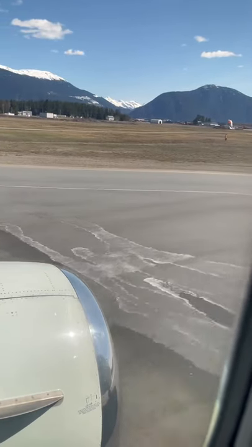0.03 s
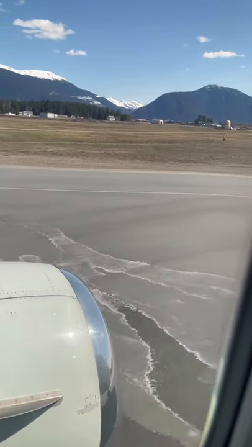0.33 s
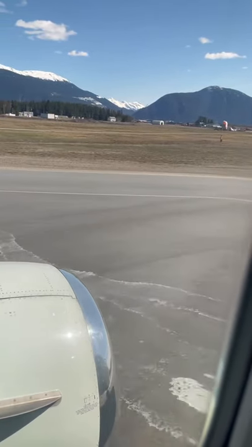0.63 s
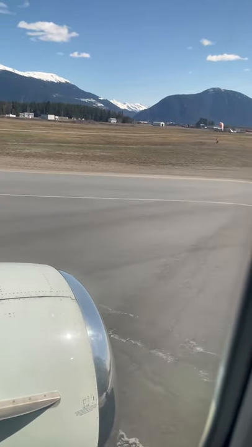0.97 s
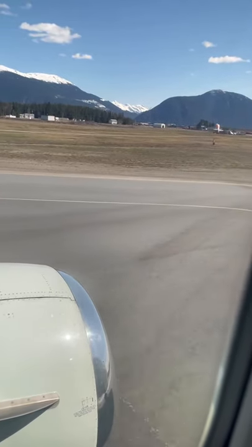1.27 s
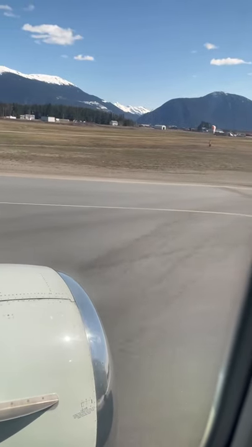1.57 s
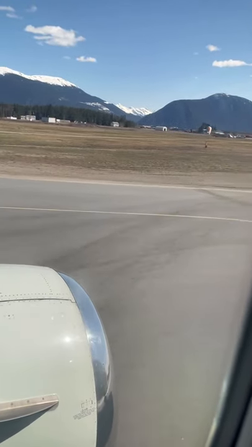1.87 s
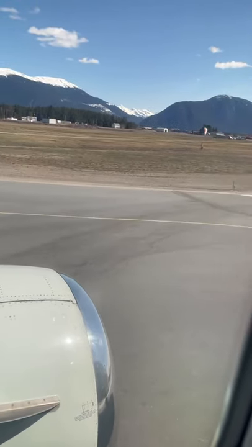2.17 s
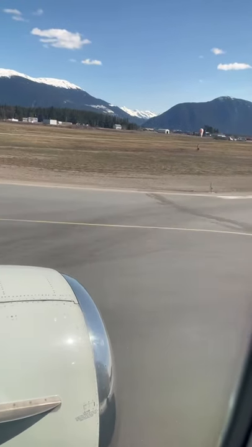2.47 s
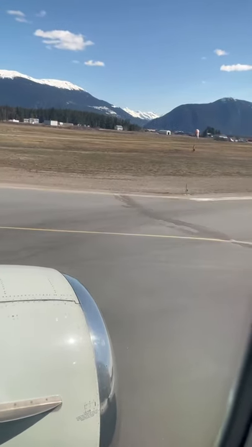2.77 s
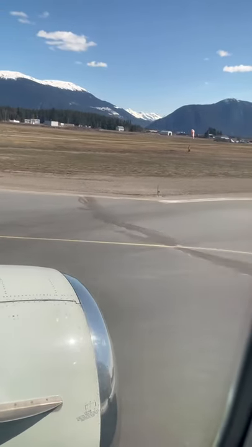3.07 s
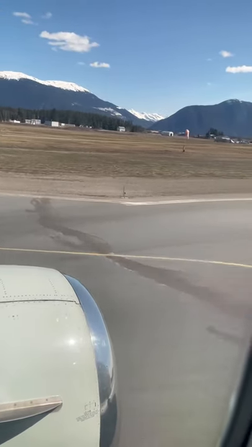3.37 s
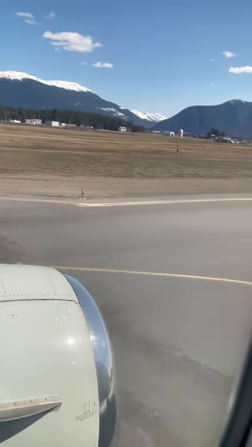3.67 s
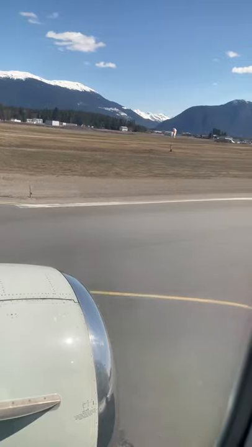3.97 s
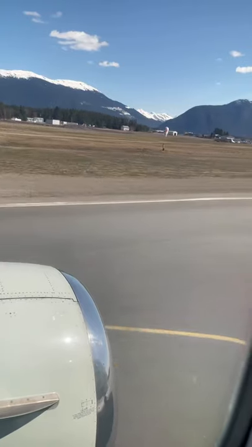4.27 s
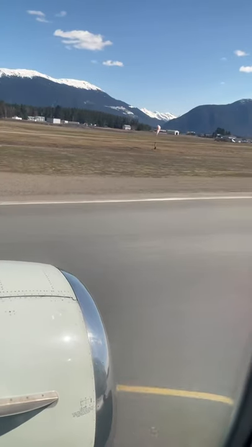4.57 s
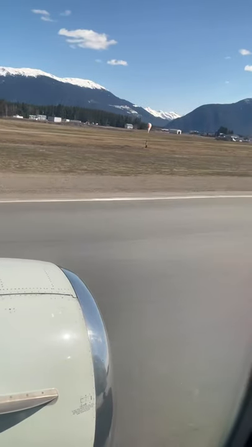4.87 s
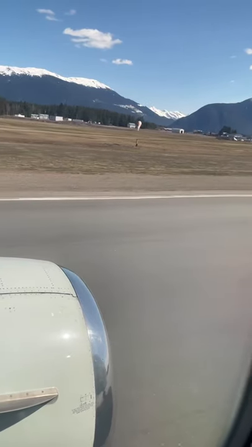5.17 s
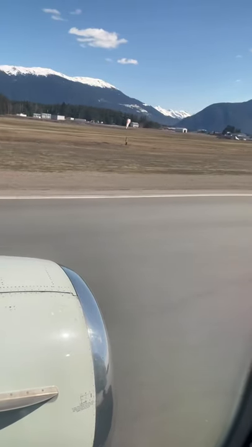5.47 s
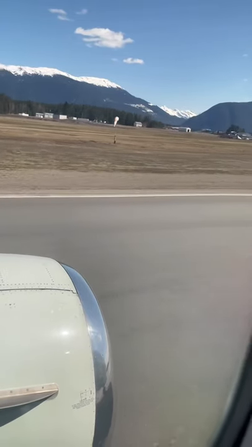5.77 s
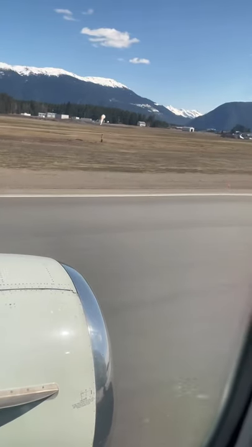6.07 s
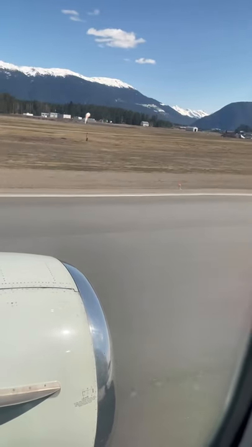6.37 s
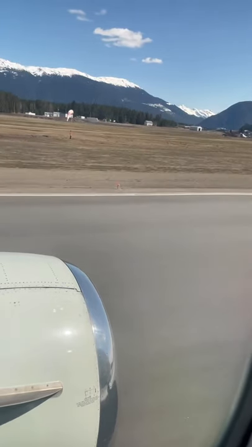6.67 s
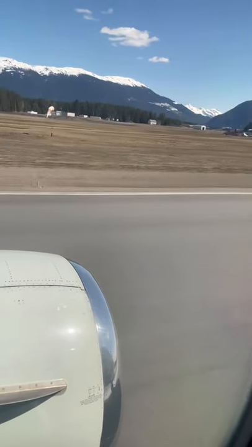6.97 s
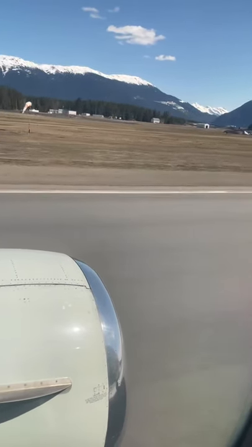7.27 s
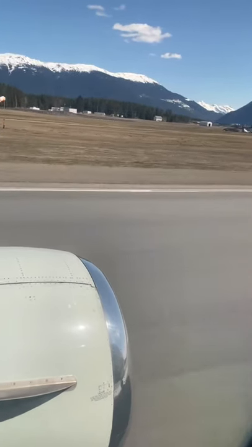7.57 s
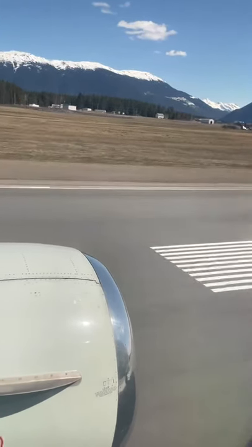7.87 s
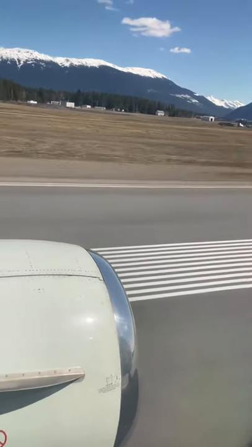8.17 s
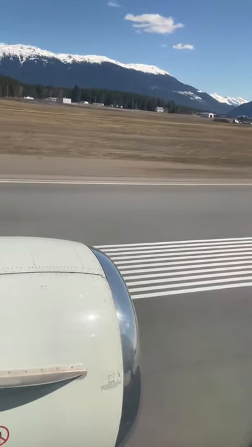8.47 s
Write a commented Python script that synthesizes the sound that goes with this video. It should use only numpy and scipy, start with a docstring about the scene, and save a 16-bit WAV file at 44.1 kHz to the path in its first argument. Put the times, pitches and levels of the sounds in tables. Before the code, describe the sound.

Inside an airliner on its takeoff roll, a heavy engine rumble and tyre drone build while a fan whine climbs in pitch.

```python
"""Rumble fills an airliner cabin and a fan whine climbs: the takeoff roll, from a seat by the engine.
Exhaust shakes the fuselage, the jet roars through the wall and the tyres drone louder with speed.
Near full power, shocks at the blade tips add a buzz of shaft orders. Ventilation hisses and
whistles, slipping plastic trim ticks and rustles, and a loose wall panel knocks.
A limiter holds the peaks down."""
import sys
import numpy as np
from scipy import signal
from scipy.fft import rfft, irfft, next_fast_len
from scipy.io import wavfile
from scipy.ndimage import uniform_filter1d, minimum_filter1d

SR = 44100
rng = np.random.default_rng(int(sys.argv[2]) if len(sys.argv) > 2 else 0)


def master_out(mix):
    """Clip the mix to full scale and print it as 16-bit PCM to the path in sys.argv[1]."""
    frames = np.transpose(np.atleast_2d(mix))
    ceiling = np.clip(frames, -1, 1)
    pcm = np.round(ceiling * 32767).astype(np.int16)
    wavfile.write(sys.argv[1], SR, pcm)


N = 384111
TIME = np.arange(N) / SR
# flat spectrum: f/Hz, level/dB
WHITE = [(20, 0), (20000, 0)]


def from_db(db):
    """Decibels to gain."""
    return 10 ** (np.asarray(db) / 20)


def unit_rms(x):
    """Scale to rms 1."""
    return x / np.sqrt(np.mean(x ** 2) + 1e-20)


def over_time(curve):
    """A (t/s, value) curve at every sample."""
    return np.interp(TIME, *np.transpose(curve))


def at_hz(curve, hz):
    """Read a (f/Hz, value) curve on a log-frequency axis."""
    known_hz, values = np.transpose(curve)
    return np.interp(np.log(hz + 1), np.log(known_hz), values)


def bell(x, centre, width):
    """Gaussian of height 1; full width at half height."""
    return 0.5 ** ((2 * (x - centre) / width) ** 2)


def drift(rate_hz):
    """Smooth random wander, rms 1."""
    hop, settle = 100, 2000
    pole = np.exp(-2 * hop * np.pi * rate_hz / SR)
    noise = rng.standard_normal(N // hop + settle + 2)
    slow = signal.lfilter([1], [1, -2 * pole, pole * pole], noise)[settle:]
    return np.interp(np.arange(N) / hop, np.arange(len(slow)), unit_rms(slow))


def cabin_noise(spectrum):
    """Diffuse stereo noise, rms 1, shaped by a (f/Hz, level/dB) spectrum."""
    # left-right likeness: f/Hz, correlation
    likeness = [(70, .9995), (150, .99), (300, .92), (400, .8), (530, 0), (1000, -.05), (1850, .82),
                (2700, .42), (4800, .1), (6000, .7), (8000, -.25), (9300, -.97), (11000, -.96), (14500, .9)]
    # balance: f/Hz, left minus right/dB
    balance = [(60, .1), (110, .7), (200, 2), (350, 3.3), (700, .4), (4400, -.2), (8000, 0)]
    size = next_fast_len(N)
    hz = np.arange(size // 2 + 1) * SR / size
    mid, side = rfft(rng.standard_normal((2, size)))
    correlation = np.clip(at_hz(likeness, hz), -1, 1)
    sign = np.array([[1], [-1]])
    field = np.sqrt(1 + correlation) * mid + sign * np.sqrt(1 - correlation) * side
    rolloff = np.maximum(hz / spectrum[-1][0], 1) ** -6
    gain = from_db(at_hz(spectrum, hz) + sign * at_hz(balance, hz) / 2)
    return unit_rms(irfft(field * rolloff * gain, size)[:, :N])


def cabin_tone(hz, scatter, rate_hz, apart_rad=0):
    """Stereo sine, rms 1: a direct path, apart_rad between channels, plus shifting reflections."""
    carrier = np.exp(2j * np.pi * np.cumsum(hz) / SR)
    paths = np.array([np.exp(1j * apart_rad * channel) + scatter * (drift(rate_hz) + 1j * drift(rate_hz))
                      for channel in range(2)])
    return unit_rms((paths * carrier).real)


def cabin_gain(hz):
    """Gain of a fan tone at the seat: bell-shaped peaks with gaps between."""
    # cabin response peaks: f/Hz, width/Hz, level/dB
    peaks = [(296, 6, -36), (300.5, 2.6, -22), (303.7, 2.3, -27.5), (306.8, 1, -28), (308.1, 2.2, -24.6),
             (310, 2.4, -25.8), (364, 22, -34.5), (380.3, 6, -31), (388, 8, -41), (1925, 24, -67),
             (2060, 64, -62), (2135, 56, -67.5), (2216, 28, -66.5), (2260, 32, -62.5), (2323, 34, -62),
             (2410, 30, -59.5), (2508, 62, -57.5), (2590, 44, -62), (2500, 900, -71), (2674, 22, -60.5),
             (2709, 28, -56.5), (2738, 24, -63.3), (2752, 20, -64.5), (2785, 22, -66), (2809, 30, -60),
             (2844, 36, -59.5), (2882, 26, -67), (2903, 14, -64.5), (2936, 12, -70.5), (4310, 60, -75),
             (4520, 70, -71), (4645, 85, -71), (4970, 190, -72.7), (5200, 80, -70), (5350, 130, -73),
             (5468, 28, -72), (5565, 40, -75), (5678, 38, -71)]
    grid_hz = np.linspace(hz.min(), hz.max(), 2000)
    power = sum((from_db(db) * bell(grid_hz, peak_hz, width_hz)) ** 2 for peak_hz, width_hz, db in peaks)
    return np.interp(hz, grid_hz, np.sqrt(power))


def resonate(x, hz, width_hz):
    """Band-pass, applied twice for steep skirts; white noise keeps about its power."""
    r = np.exp(-np.pi * width_hz * np.sqrt(2) / SR)
    section = [(1 - r * r) / 2, 0, (r * r - 1) / 2, 1, -2 * r * np.cos(2 * np.pi * hz / SR), r * r]
    return signal.sosfilt([section, section], x + 1e-18) * np.sqrt(SR / 2 / width_hz)


def ring_through(x, resonances):
    """Parallel resonances: f/Hz, width/Hz, gain/dB."""
    return sum(from_db(db) * resonate(x, hz, width_hz) for hz, width_hz, db in resonances)


def exhaust_rumble(spool, surge):
    """Exhaust shakes the fuselage, harder with fan speed and acceleration."""
    # rumble spectrum: f/Hz, level/dB
    spectrum = [(8, -26.5), (15, -24), (30, -22), (38, -15.5), (48, -2), (66, 2), (88, -3), (115, -1),
                (135, -8.5), (150, -6), (172, -16.5), (230, -34.5)]
    return from_db(-24.5 + 5.5 * spool + 2 * surge) * cabin_noise(spectrum)


def tyre_drone(final_db=-24.5):
    """Tyres drone louder as ground speed builds."""
    # tyre spectrum: f/Hz, level/dB
    spectrum = [(60, -29), (80, 4), (112, 3), (135, -11.5), (155, -8.5), (185, -16.5), (260, -24.5)]
    speed = TIME / TIME[-1]
    return from_db(final_db) * speed ** 0.74 * cabin_noise(spectrum)


def jet_roar(spool, surge):
    """Jet mixing noise, dulled by the wall; its level flutters."""
    # roar spectrum: f/Hz, level/dB
    spectrum = [(140, -19), (180, -4.5), (215, 0.5), (265, -2.5), (300, -0.95), (350, -7), (405, -7.5),
                (450, -11.5), (510, -17), (720, -25), (950, -33.5), (1050, -32.5), (1200, -45.5)]
    level_db = -26 + 2 * spool + 2.5 * surge + 0.91 * drift(rate_hz=13)
    return from_db(level_db) * cabin_noise(spectrum)


def fan_whine(blade_hz, floor_db=-78, octave_floor_db=-79):
    """The blade-passing tone and its octave waver, and swell at each cabin peak they cross."""
    # brief dips of the fundamental: t/s, length/s, depth/dB
    dips = [(4.21, .08, 7), (4.52, .16, 6), (5.50, .08, 11), (5.70, .07, 6), (6.02, .2, 10), (7.88, .18, 7)]
    # standing waves put left and right out of step: f/Hz, phase difference/rad
    phases = [(2400, .4), (2510, 1.2), (2600, .5), (2700, .7), (2730, 2.1), (2748, 1.3), (2765, .6),
              (2950, .6)]
    hz = blade_hz * (1 + 0.0009 * drift(rate_hz=12))
    dip_db = sum(db * bell(TIME, at_s, length_s) for at_s, length_s, db in dips)
    whine = cabin_tone(hz, scatter=0.42, rate_hz=18, apart_rad=at_hz(phases, blade_hz))
    whine *= np.hypot(from_db(floor_db), cabin_gain(blade_hz))
    octave = cabin_tone(2 * hz, scatter=1.1, rate_hz=18)
    octave *= np.hypot(from_db(octave_floor_db), cabin_gain(2 * blade_hz))
    return from_db(-dip_db) * whine + octave


def ventilation(surge, sink_db_per_s=0.17):
    """Rushing air, hollow resonances and blower whistle; all swell with the surge and sink slowly."""
    # air rush spectrum: f/Hz, level/dB
    spectrum = [(600, -10.5), (1150, -2), (1450, 0.5), (1850, -7.5), (2060, -4.5), (2350, -10), (2800, -13),
                (3150, -17), (3500, -17.5), (4100, -19), (5500, -34)]
    # blower tones: f/Hz, initial level re rush/dB, waver/Hz, fade weight
    blower_tones = [(1400, -16, 4, 0.3), (1470.5, -1.8, 3.5, 0.85), (3482, -20.5, 38, 2)]
    # resonances stirred by the air: f/Hz, width/Hz, initial level re rush/dB
    hollows = [(556, 53, 2), (727.5, 53, 2), (844, 71, 0.5), (1051, 150, -7)]
    whistle_fade_db, hollow_fade_db = -0.73 * TIME, -0.16 * TIME   # re rush
    whistle = np.zeros((2, N))
    for hz, db, waver_hz, fade_weight in blower_tones:
        tone = cabin_tone(hz + waver_hz * drift(rate_hz=8), scatter=0.035, rate_hz=2.6)
        whistle += from_db(db + fade_weight * whistle_fade_db) * tone
    hollow = from_db(hollow_fade_db) * ring_through(cabin_noise(WHITE), hollows)
    level_db = -53 + surge - sink_db_per_s * TIME
    return from_db(level_db) * (cabin_noise(spectrum) + hollow + whistle)


def trim_rings(friction, snap_hz, body_db, ring_db, sizzle_db):
    """Friction stirs four resonances of the plastic; snap and ring lie higher on smaller parts."""
    # f/Hz, width/Hz, gain re snap/dB
    modes = [(3550, 1600, body_db), (0.76 * snap_hz, 760, ring_db),
             (snap_hz, 2000, 0), (13500, 6500, sizzle_db)]
    return ring_through(friction, modes)


def trim_rattle(base_rate_hz=45, decay_s=0.003):
    """Vibration shakes out tiny ticks in loose clumps, over a fine restless hiss."""
    # treble contour that ticks and hiss follow: t/s, level/dB
    treble = [(0, -60), (1.2, -60), (2.7, -57.5), (4.4, -61.5), (5.8, -61), (7.5, -63), (8.71, -63.5)]
    treble_db = over_time(treble)
    onsets = rng.random(N) < base_rate_hz * from_db(4 * drift(rate_hz=5)) / SR
    sizes = from_db(6.5 * np.minimum(rng.exponential(1, N), 2))
    slips = signal.lfilter([1], [1, -np.exp(-1 / (decay_s * SR))], onsets * sizes + 1e-18)
    rings = trim_rings(slips * cabin_noise(WHITE), snap_hz=7800, body_db=-6, ring_db=-4, sizzle_db=-1)
    rattle_db = -69.5 + 2 * (treble_db - treble_db.mean())
    # hiss spectrum: f/Hz, level/dB
    spectrum = [(1500, -12), (2300, 4.5), (2750, 7), (3200, 1.5), (3500, .5), (4300, 0), (5200, 2.3),
                (7000, 0), (8600, 1), (10000, -1.2), (12000, -3.2), (14300, -1.7), (16000, -5)]
    hiss_db = treble_db + 1.5 + 0.5 * drift(rate_hz=12)
    return from_db(rattle_db) * unit_rms(rings) + from_db(hiss_db) * cabin_noise(spectrum)


def slip(start_s, level_db, t60_s, rise_s=0.0014):
    """Envelope of one friction burst: quick rise, exponential decay."""
    envelope, start = np.zeros(N), int(start_s * SR)
    age_s = TIME[:min(SR // 4, N - start)]
    rise = 1 - np.exp(-age_s / rise_s)
    envelope[start:start + len(age_s)] = rise * from_db(level_db - 60 * age_s / t60_s)
    return envelope


def trim_ticks(boost_db=2):
    """Plastic trim slips in short friction bursts, each with its own pitch and resonance mix."""
    # slips: t/s, level before boost/dB, t60/s, snap f/Hz, then re snap: body/dB, ring/dB, sizzle/dB
    ticks = [(0.601, -45, 0.017, 8600, -20, -18, -1), (0.943, -47, .014, 7400, -14, -10, -8),
             (1.280, -44, .025, 8300, -4, -10, -2), (1.719, -54, .035, 7500, -2, -1, -1),
             (1.800, -50, 0.038, 8000, -2, -1, 1), (1.868, -52, .035, 7500, 2, 0, -3),
             (1.971, -46, .014, 8500, -12, -14, 1), (2.002, -50, .025, 7500, 3, 1, -2),
             (2.05, -50, .04, 7500, -4, -4, -3), (2.301, -54, .03, 7500, 4, -3, -3),
             (2.331, -52, .04, 8500, -1, -7, 2), (2.479, -56, .044, 8500, -6, -2, 6),
             (2.641, -39, .012, 7800, -17, -3, -3), (2.677, -45, .014, 8000, -12, -8, -2),
             (2.73, -42, .022, 8300, -2, 0, 2), (2.806, -32, 0.01, 8100, -19, -1, -4),
             (3.055, -50, .05, 8500, -6, -7, 3), (3.426, -39, .012, 7600, -20, -18, -9),
             (3.713, -57, 0.023, 8000, 5, 3, 3), (4.836, -47, .018, 7800, -12, -3, -1),
             (5.014, -53, .06, 7700, -3, -5, -3), (5.594, -48, .025, 7500, -8, -5, 1),
             (5.776, -36, .0098, 7700, -20, -17, -8), (6.113, -47, .014, 7500, -12, -3, -8),
             (6.127, -45, 0.024, 8300, -8, -9, -3), (6.141, -49, .03, 8560, -1, -4, 0),
             (6.399, -51, .018, 7500, -8, -4, -3), (7.167, -44, .015, 7400, -15, 1, -5),
             (7.345, -52, .015, 7500, -5, -12, -6), (7.624, -58, .02, 7500, -8, 2, 7),
             (8.662, -48, .018, 7800, -8, -5, -5)]
    friction = cabin_noise(WHITE)
    out = np.zeros((2, N))
    for start_s, level_db, t60_s, *colour in ticks:
        start = int(start_s * SR)
        span = slice(start, start + SR // 8)
        envelope = slip(start_s, level_db + boost_db, t60_s)
        out[:, span] += trim_rings(envelope[span] * friction[:, span], *colour)
    return out


def trim_rustles(grain_db=2):
    """Where trim rubs instead of snapping, a grainy rustle swells and fades."""
    # rubs: centre t/s, length/s, level/dB
    rubs = [(1.813, .05, -60), (2.355, .06, -57), (3.203, .04, -58), (5.61, .03, -58), (5.676, .055, -55),
            (5.815, .02, -56)]
    # rustle spectrum: f/Hz, level/dB
    spectrum = [(1500, -1), (3500, -2), (6400, 3), (9500, -8), (12000, -6), (14500, 0), (16000, -2)]
    envelope = sum(from_db(db) * bell(TIME, at_s, length_s) for at_s, length_s, db in rubs)
    grain = unit_rms(from_db(grain_db * drift(rate_hz=200)))
    return envelope * grain * cabin_noise(spectrum)


def panel_knocks():
    """A loose wall panel shifts with a dull, woody knock."""
    # shifts: t/s, level/dB, t60/s
    knocks = [(3.346, -45, 0.045), (5.687, -47, 0.055), (6.608, -47.5, 0.051), (8.296, -54, .06)]
    # panel resonances: f/Hz, width/Hz, gain/dB
    modes = [(1100, 650, 7), (2200, 1100, 1.5), (5400, 2600, -2.5), (10000, 6000, -6)]
    friction = sum(slip(*knock) for knock in knocks) * cabin_noise(WHITE)
    return ring_through(friction, modes)


def fan_buzz(blade_hz, blades=38, orders=(4, 5), onset_hz=2673, onset_width_hz=77):
    """Near full power, blade-tip shocks buzz at multiples of the shaft speed."""
    shocks = 0.5 + 0.5 * np.tanh((blade_hz - onset_hz) / onset_width_hz)
    shaft_hz = blade_hz / blades
    buzz = sum(cabin_gain(order * shaft_hz) * cabin_tone(order * shaft_hz, scatter=0.066, rate_hz=6.3)
               for order in orders)
    lean_left = from_db([[1], [-1]])
    return lean_left * shocks * buzz


def fan_surge(spool, smooth_s=1.5, lag_s=0.33):
    """Fan acceleration, smoothed and delayed; 1 at its strongest."""
    acceleration = uniform_filter1d(np.gradient(spool), size=int(smooth_s * SR))
    return np.interp(TIME - lag_s, TIME, acceleration / acceleration.max())


def limit(x, ceiling, window_samples):
    """Soft-knee look-ahead limiter: the gain dips around each peak."""
    load = np.abs(x).max(axis=0) / ceiling
    gain = minimum_filter1d((1 + load ** 12) ** (-1 / 12), size=window_samples)
    for _ in range(2):
        gain = uniform_filter1d(gain, size=window_samples // 2)
    return x * gain


def scene():
    """Outside, tyres and an engine that follows the fan speed; inside, air and trim."""
    # fan speed: t/s, blade-passing f/Hz
    fan_speed = [(0.0, 1800), (0.8, 1903), (1.1, 2032), (1.5, 2112), (2.05, 2166), (3.0, 2484), (4.0, 2728),
                 (4.25, 2794), (4.7, 2749), (5.35, 2730), (5.85, 2762), (6.7, 2853), (7.4, 2908),
                 (8.71, 2947)]
    blade_hz = over_time(fan_speed)
    spool = (blade_hz - blade_hz.min()) / np.ptp(blade_hz)   # 0 slowest, 1 fastest
    surge = fan_surge(spool)
    rumble = exhaust_rumble(spool, surge) + tyre_drone() + jet_roar(spool, surge)
    fan = fan_whine(blade_hz) + fan_buzz(blade_hz)
    inside = ventilation(surge) + trim_ticks() + trim_rustles() + panel_knocks() + trim_rattle()
    return rumble + fan + inside


def record(dry, split_hz=95, stopband_hz=16400):
    """Limit the bass alone, then the whole mix with a faster limiter; cut the top."""
    bass = signal.sosfiltfilt(signal.butter(3, split_hz, fs=SR, output="sos"), dry)
    held_bass = limit(bass, ceiling=0.15, window_samples=801)
    held = limit(dry - bass + held_bass, ceiling=0.295, window_samples=221)
    return signal.sosfilt(signal.cheby2(16, 70, stopband_hz, fs=SR, output="sos"), held)


dry = scene()
out = record(dry)
master_out(out)
```